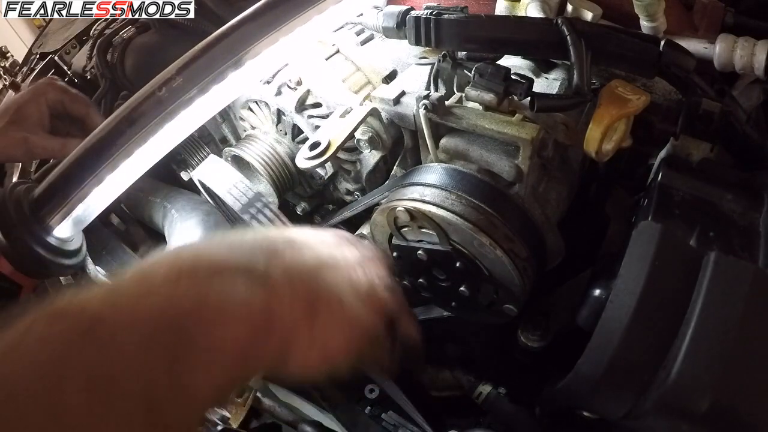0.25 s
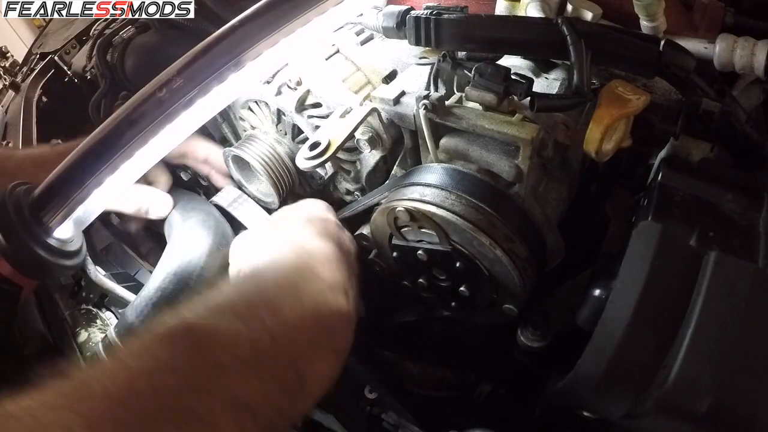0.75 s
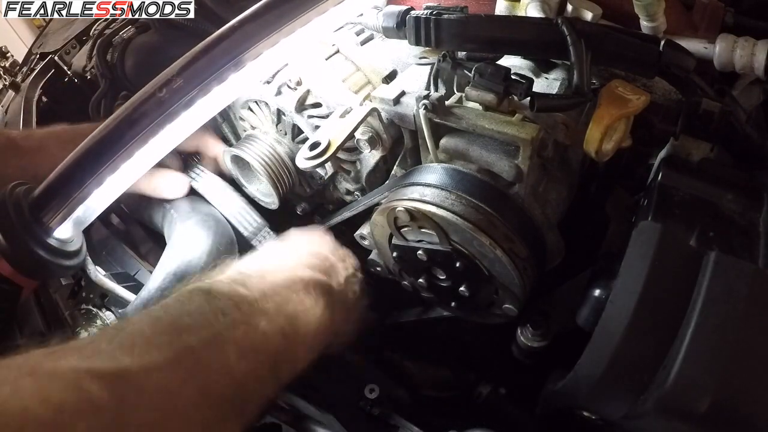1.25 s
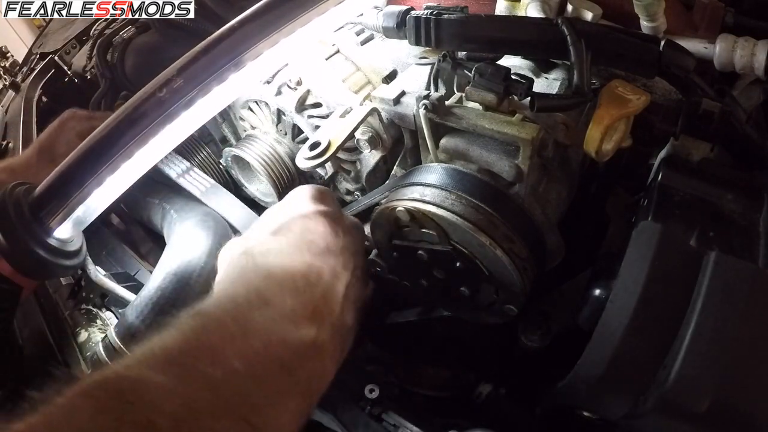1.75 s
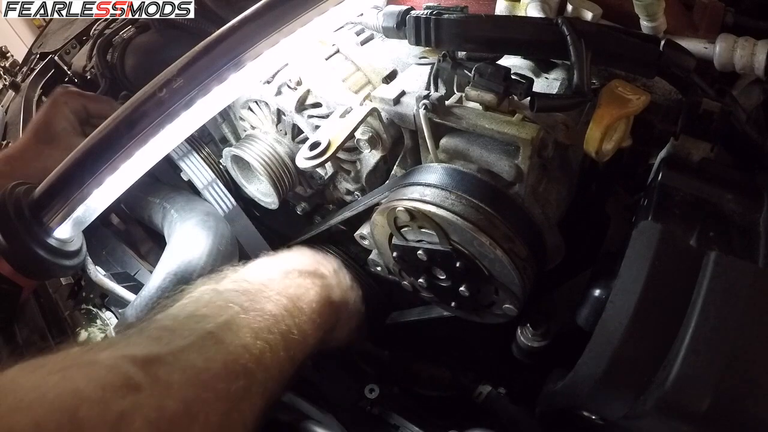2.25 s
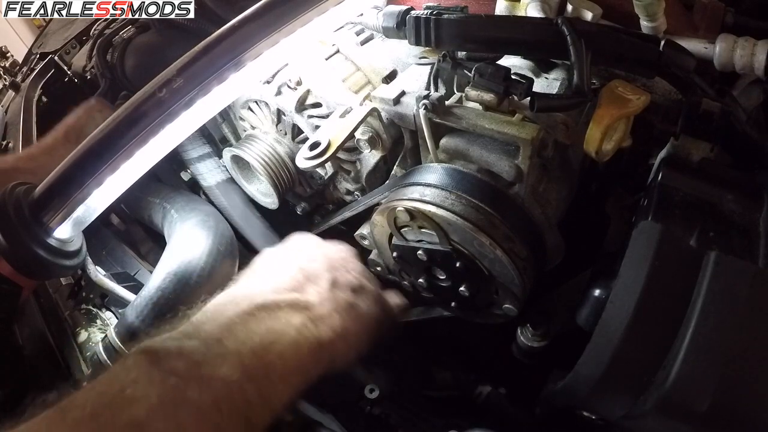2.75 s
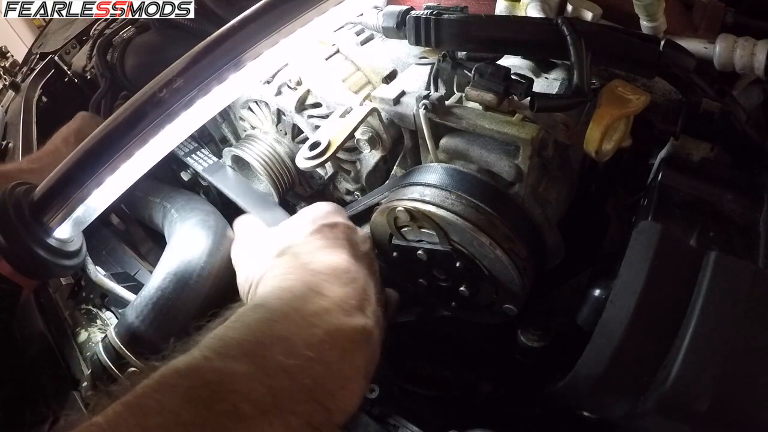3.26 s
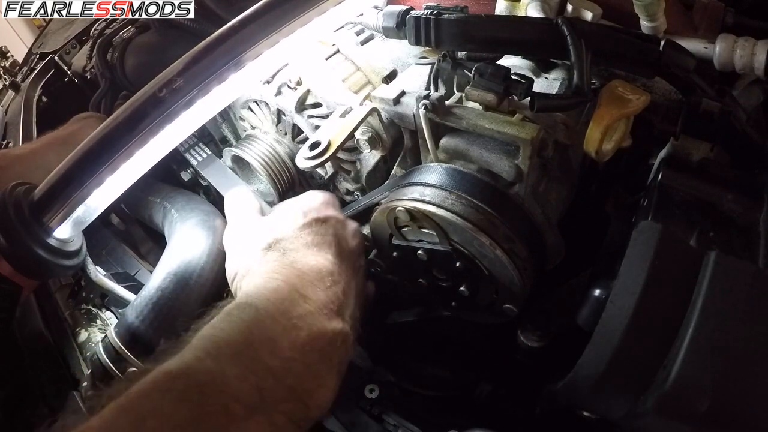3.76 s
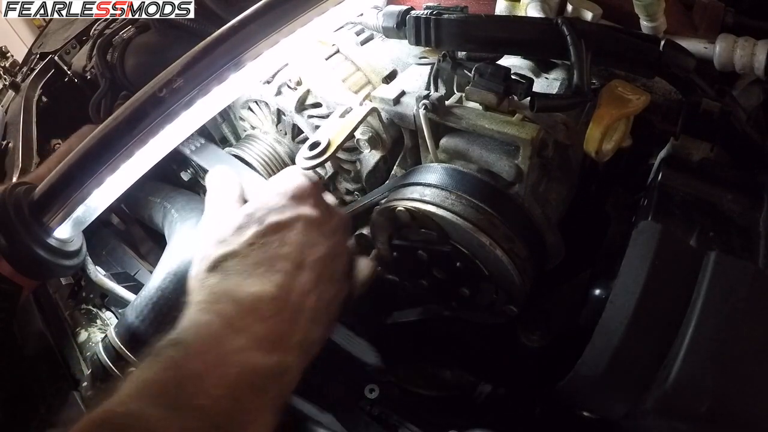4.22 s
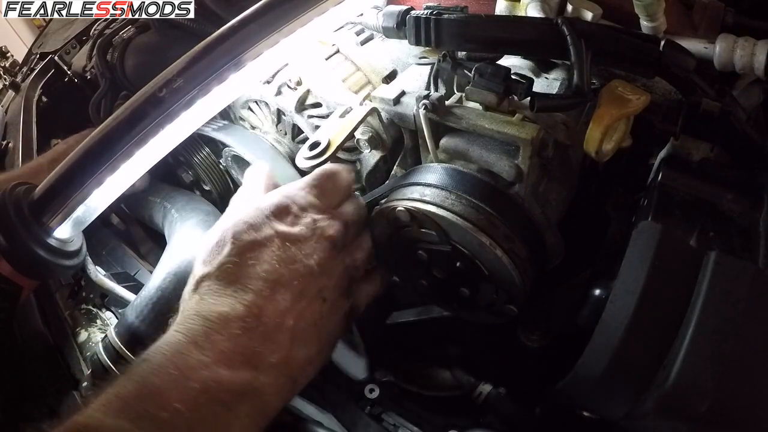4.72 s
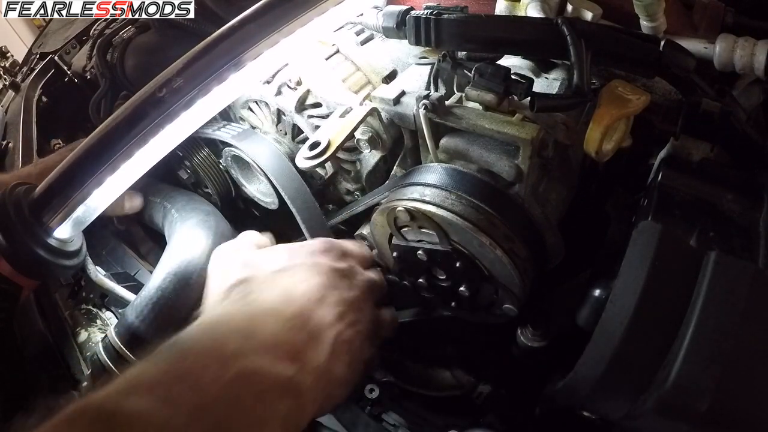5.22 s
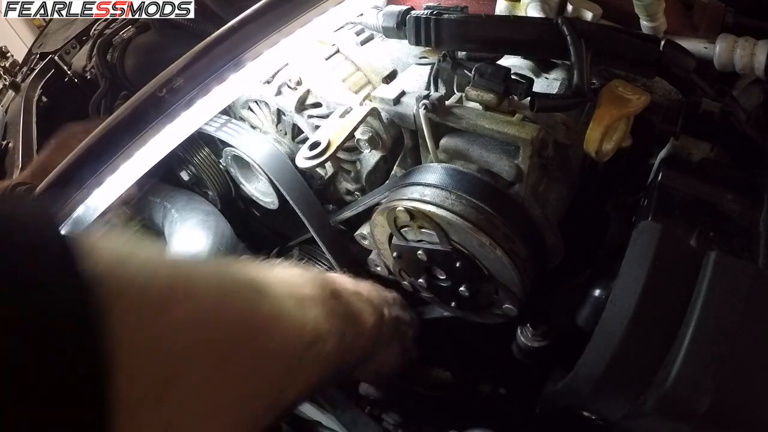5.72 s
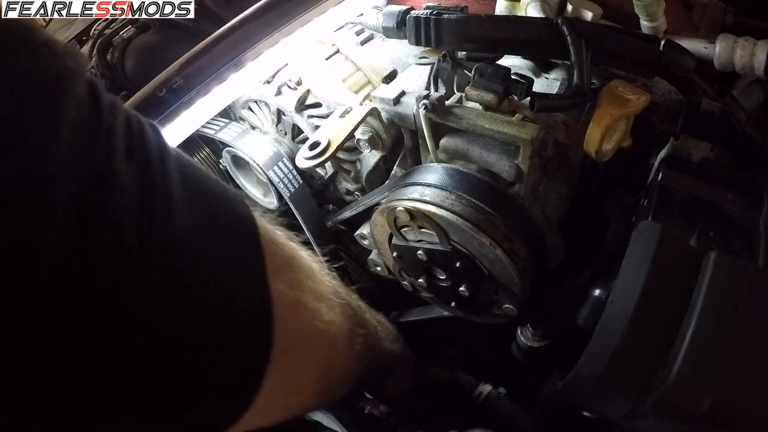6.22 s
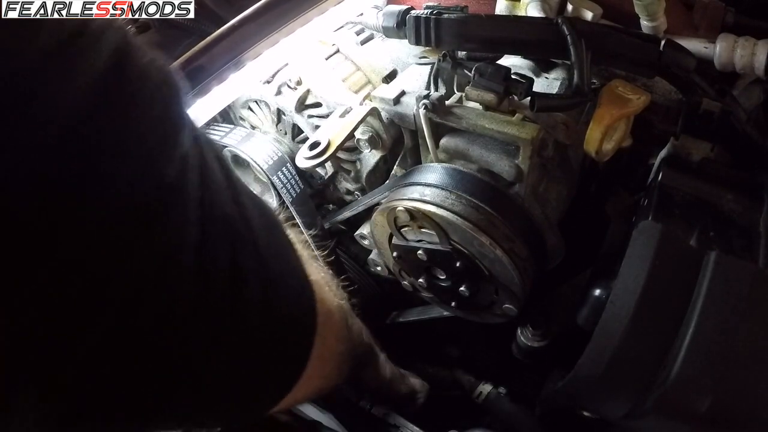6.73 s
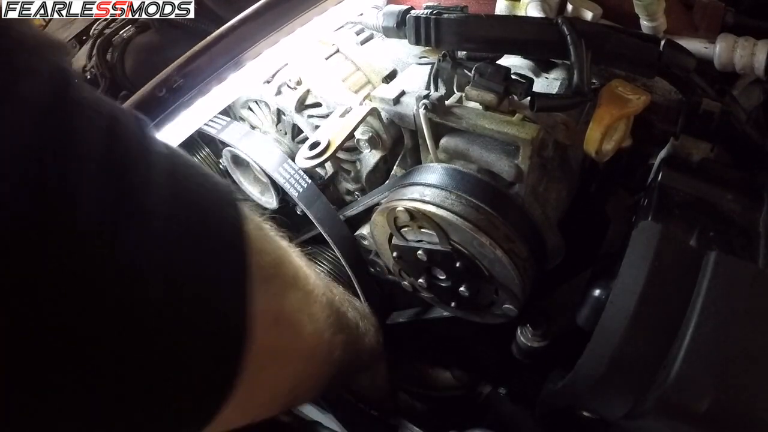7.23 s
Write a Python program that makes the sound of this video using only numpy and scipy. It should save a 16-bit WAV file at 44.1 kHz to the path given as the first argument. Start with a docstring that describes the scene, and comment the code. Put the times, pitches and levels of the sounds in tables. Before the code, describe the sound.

Close, boomy handling knocks and low rumbling tremble as a rubber belt scuffs over metal pulleys, with brief squeaks and a final sharp click.

```python
"""Ribbed belt worked onto engine pulleys

Hands work the belt in a garage, close to a small camera with two microphones clamped to the car.
Tugs and knocks ring the modes of car and mount, mostly pushing the microphones in opposite directions;
squeaks come through the metal too, and short decaying tones add pips and ticks to the clacks. Through
the air come filtered noise for rub, scuffs and hush, and narrow resonances for drones and two whistles."""
import sys
import numpy as np
from scipy import signal
from scipy.fft import rfft, irfft
from scipy.io import wavfile
from scipy.ndimage import uniform_filter1d

SR = 44100
rng = np.random.default_rng(int(sys.argv[2]) if len(sys.argv) > 2 else 0)


def inscribe(sig):
    """Save sig as 16-bit PCM at rate SR to the path in sys.argv[1].

    A 1-D sig is mono; a 2-D sig holds one channel per row.
    Samples are clipped to [-1, 1] before scaling.
    """
    pcm = np.round(np.clip(np.atleast_2d(sig).T, -1, 1) * 32767)
    wavfile.write(sys.argv[1], SR, pcm.astype(np.int16))


N = 329868

# Knocks of belt, knuckles and pulleys. Each row: start in seconds, thump in relative dB, landing place
# (-1 rocking body, 0 sway, 1 arm, 2 clamp), clack in relative dB, hardness (0 casing, 1 lid, 2 tick),
# ring of the sway (300 leaves its modes as listed), contact time in ms.
KNOCKS = [(0.0851, -4, 1.3, -2, 1.37, 320, 5.1), (0.0899, -1.5, 1.16, -30, 0, 370, 6.4),
          (0.126, -10, 1.55, -19, 0.058, 200, 4), (0.171, 3.5, 1.3, -21, 0.31, 250, 4),
          (0.302, -1, 0.7, -45, .2, 290, 3.7), (0.339, 4, 0.54, -13.5, 0.3, 130, 5.8),
          (0.396, -4, -0.2, -37, 0.71, 220, 3.4), (0.564, -13, 0.49, -44, .1, 75, 5.2),
          (0.621, -10, 0.49, -22.5, 0.35, 110, 1), (0.716, 5, 0.94, -18, 0.16, 130, 4.7),
          (0.751, 2.5, 0.83, -23, 0.11, 310, 2.6), (0.798, 3, 1.15, -14, 0.81, 100, 2.2),
          (0.807, 3, 0.74, -12, 0.5, 120, 4.8), (0.815, -17, 0.98, -11, 0.71, 110, 11),
          (0.882, 5, 1.32, -10, 0.55, 180, 7.2), (0.973, 6, 0.57, -20.5, 0.074, 510, 5.6),
          (1.015, 9, 0.5, -14, 0.79, 180, 6.2), (1.018, -7, 2, -43, 0, 150, 4),
          (1.103, -3.5, 0, -52, 0.31, 480, 4.7), (1.133, 7, 0.73, -8, 1.07, 220, 10.5),
          (1.134, -4, 2, -44, 0, 150, 4), (1.142, -1.5, 0.95, -11, 0.39, 170, 2.4),
          (1.167, -11.5, 2, -17, .8, 150, 17), (1.264, 4.5, 0.85, -35, 0.033, 170, 2.9),
          (1.301, -6, 1.57, -45, 0, 150, 4), (1.317, 4, 0.71, -48.5, 0.2, 430, 4.5),
          (1.393, 6, 0.51, -45, 0.18, 380, 4.2), (1.58, 8, 0.56, -24.5, 0.77, 170, 1.82),
          (1.663, -6.5, 1.16, -40, 0, 170, 4), (2.024, -9.5, 1.56, -45, 0.046, 150, 4),
          (2.03, 2, 0.6, -12, 0.39, 490, 16), (2.138, 1, 0.41, -32.5, 0, 135, 4.9),
          (2.294, -2.5, 0.045, -31, 0.061, 210, 3.1), (2.35, -26, -0.46, -47, 0.25, 140, 3.4),
          (2.474, 2, 0.64, -42, 0.48, 370, 4.7), (2.525, 2.5, 0.24, -50.5, .2, 200, 8.3),
          (2.548, -19, 2, -45, 0, 200, 3.5), (2.572, 8.5, 0.31, -23, 1.46, 120, 2.2),
          (2.823, 3.5, 0.51, -29, 1.2, 550, 24), (2.851, -3.5, 1.4, -45, 0, 150, 4),
          (2.87, 2.5, -0.16, -23, .2, 120, 8.1), (2.961, 4.5, 0.37, -15, 0.5, 480, 43),
          (2.981, -1.5, 1.8, -45, 0, 150, 4), (3.091, 7.5, 0.23, -41, 0.35, 94, 4),
          (3.237, -26, -0.74, -49, 0.17, 140, 4), (3.373, 9.5, 0.57, -7.5, 0.49, 410, 10),
          (3.378, -3, 1.7, -43, 0, 150, 4), (3.447, -6.5, 1.54, -51, 0.33, 390, 3.83),
          (3.5, 6.5, 0.47, -30, 0.21, 380, 3.6), (3.576, -2.5, -0.48, -28, 0.76, 250, 4),
          (3.794, -21, 2.04, -32, 0.81, 120, 4.5), (4.131, 5.5, 0.44, -34.5, 0.48, 335, 3.4),
          (4.454, -3, 0.1, -24.5, 1.46, 140, 15), (4.653, -11.5, 0.42, -42, 0, 440, 6),
          (4.7, 3, 1.62, -38, 0, 127, 4), (4.711, 1, 0.9, -45, 0, 180, 4),
          (4.734, -1.5, 0.7, -42, 0, 110, 4), (4.803, 3.5, 0.59, -17.5, 1, 900, 5.6),
          (4.806, 1.5, 1.45, -44, 0, 150, 4), (5.202, 7, 0.31, -18, 0.57, 150, 7.4),
          (5.288, -5.5, 0.068, -50, 0, 140, 4.4), (5.443, 3.5, 0.29, -42, 0, 113, 4),
          (5.476, -2.5, -0.2, -38, 0.47, 97, 3.6), (5.556, -4, 0.024, -37, 0.089, 830, 3.6),
          (5.666, -17, 1.8, -25, 0.69, 210, 83), (5.69, -3.5, 1.15, -24, 0, 200, 4.3),
          (5.715, -4, 1.1, -43, 0, 110, 4), (5.873, -4.5, 0, -26.5, 0.65, 840, 3.7),
          (5.887, -25, 0.004, -23, 0.65, 200, 10), (5.897, -1, 0.66, -12.5, 0.63, 1000, 8.7),
          (5.977, 0.5, 0.74, -20, 0.73, 850, 7), (6.058, -2, 0.55, -45, .2, 450, 4),
          (6.136, 2, -0.57, -41, 0.31, 170, 4), (6.175, 7.5, 0.53, -11.5, 0.25, 200, 7.3),
          (6.233, -10, 1.6, -44, 0, 150, 4), (6.276, -14, 1.64, -48, 0.12, 150, 4),
          (6.311, 5, 0.41, -22, 0.37, 280, 4.4), (6.369, 5, 0.77, -15.5, 0.75, 580, 22),
          (6.454, -1.5, 0.42, -40, .2, 122, 4), (6.691, -1, -0.11, -32, 0, 150, 4),
          (6.799, -9, -0.28, -42, .2, 170, 4.3), (6.818, -1, 0.71, -19, 1.33, 98, 35),
          (6.947, -15, 1.2, -48, 0, 140, 4), (6.961, -2, -0.84, -29, 1, 240, 3.5),
          (6.974, -13, 1.7, -19, 0.8, 110, 2.1), (6.986, 4, 1.35, -8, 0.85, 240, 6),
          (7.159, 13, 0.7, -2.5, 0.77, 110, 4.4), (7.183, 6, 1.2, -36, 0.16, 140, 5.2),
          (7.221, 0.5, 1.93, -9.5, 0.41, 230, 3.5)]
# Modes of the car and mount, from the heaviest part to the lightest. Each row: pitch in Hz, basic t60
# in seconds, level in relative dB, left microphone against right in dB, left phase in turns.
ROCKING_MODES = [(28, 0.087, -1.5, -5.5, 0.22), (56, 0.022, -17.5, -12.5, 0.61),
                 (73.5, 0.14, 1.2, -7.5, 0.43)]
SWAY_MODES = [(106.58, 0.29, 0.5, -10, 0.466), (132.5, 0.24, -8.5, -6.5, 0.33)]
ARM_MODES = [(181, .18, 0, -13, .49), (212, .1, -7, -11, .51), (243, .12, -12, -6, .47)]
CLAMP_MODES = [(300, .06, -8, -9, .5), (335, .1, 0, -10, .51), (385, .11, -1, -10, .51),
               (447, .08, -11, -.8, .49)]
CASING_MODES = [(518, .05, -2, -0.8, .48), (575, .06, 1, -2.1, .47), (750, 0.037, -2, -3.3, 0.58),
                (882, 0.066, -9, 1, 0.47)]
LID_MODES = [(603, 0.067, -1.5, 0, 0.47), (963, 0.046, 1.5, -7, 0.49), (1088, 0.044, 0, 4, .42),
             (1250, .03, -14, 1, 0.47), (1450, 0.058, -3, -2, 0.4), (1913, 0.039, -11.5, -6, 0.27)]


def gain_of(db):
    """Decibels to gain."""
    return 10 ** (np.asarray(db) / 20)


def evened(x):
    """Scales to rms 1."""
    return x / np.sqrt(np.mean(abs(x) ** 2) + 1e-20)


def read(points, hz):
    """Reads a spectrum on a log-frequency axis."""
    f, value = np.transpose(points)
    return np.interp(np.log(hz + 1), np.log(f + 1), value)


def along(rows, axis=1):
    """One column of a curve at every sample."""
    rows = np.asarray(rows)
    return np.interp(np.arange(N) / SR, rows[:, 0], rows[:, axis])


def add(mix, s, sound):
    """Mixes a two-channel sound in at time s."""
    part = mix[:, round(s * SR):][:, :sound.shape[1]]
    part += sound[:, :part.shape[1]]


def wobble(hz, width):
    """Noise in one resonance, as a complex oscillation of rms 1."""
    pole = np.exp((2j * hz - width) * np.pi / SR)
    push = rng.standard_normal(N) + 1j * rng.standard_normal(N)
    return evened(signal.lfilter([1], [1, -2 * pole, pole ** 2], push))


def ports(left_db, turns):
    """How one mode reaches the left and the right microphone."""
    return np.array([[gain_of(left_db) * np.exp(2j * np.pi * turns)], [1]])


def shaking(modes, level_db, blur, steady, jerky_db):
    """Small slips keep every mode of a part trembling in jerks; the beats of the trembling are partly evened out."""
    z = 0
    for hz, t60, db, left_db, turns in modes:
        z = z + gain_of(db) * ports(left_db, turns) * wobble(hz, blur / t60)
    beats = np.sqrt(uniform_filter1d(abs(z[1]) ** 2, 500) + 1e-9)
    slips = uniform_filter1d(rng.standard_normal(N), 900)
    jerks = evened(uniform_filter1d(slips, 900))
    z = z / beats ** np.clip(steady, 0, 1) * gain_of(jerky_db * jerks)
    return gain_of(level_db) * z.real / np.sqrt(np.mean(z[1].real ** 2))


def held_db():
    """While the mount rings long and freely after a knock, no hand trembles on it."""
    free_ring = 480  # a sway ring setting above this is not held by a hand
    rows = np.asarray(KNOCKS)
    t, out = np.arange(N) / SR, np.zeros(N)
    for s, ring_ms in rows[rows[:, 5] > free_ring][:, [0, 5]]:
        out[(t > s) & (t < s + .3 * ring_ms / 1000)] = -18
    return uniform_filter1d(out, 800)


def handling():
    """The car and the parts of the camera mount tremble in their modes under the working hands."""
    # How hard the hands shake the car. Each row: time in seconds, effort in relative dB, shift of the
    # trembling from the sway to the higher parts in dB before each part takes its share.
    effort = [(0.0, -48.5, 8.5), (0.14, -21.5, 0), (0.29, -31, 0), (0.44, -27.5, -1), (0.89, -24.5, 2),
              (1.2, -26.5, 1), (1.245, -35, -3), (1.31, -24, 1.5), (1.53, -29, -2), (1.77, -32.5, 1),
              (1.96, -35.5, 1), (2.71, -28, -1.5), (2.85, -33.5, 3.5), (3.0, -21, 3), (3.14, -30.5, -3),
              (3.48, -28.5, 5), (3.64, -42.5, -19), (3.83, -48.5, -9), (4.14, -46, 0), (4.35, -31.5, 1.5),
              (4.52, -40, -14), (4.6, -51, -5), (4.69, -40, -3), (4.85, -30.5, 7.5), (5.02, -58, -4),
              (5.18, -51, 10), (5.27, -38, 4.5), (5.39, -32, -1), (5.62, -27, -7.5), (5.94, -38, 4),
              (6.08, -21.5, 1), (6.27, -21.5, -1.5), (6.48, -35.5, -4.5), (6.73, -34.5, 4),
              (7.04, -30, 2.5), (7.1, -22.5, -2.5), (7.21, -17.5, 0), (7.35, -26, 4.5), (7.48, -29, -6)]
    effort_db, shift_db = along(effort, axis=1), along(effort, axis=2)
    # each part: dB above the effort, share of the shift
    rocking_db = effort_db + 2.6 - 0.74 * shift_db
    sway_db = effort_db + 10.7 - 0.23 * shift_db
    arm_db = effort_db + 5.93 + 0.92 * shift_db
    clamp_db = effort_db - 10 + 2.1 * shift_db
    casing_db = effort_db - 23.5 + 0.66 * shift_db
    lid_db = casing_db - 4.5
    free_db = held_db()
    out = shaking(ROCKING_MODES, rocking_db + 0.35 * free_db, blur=3.9, steady=0.22, jerky_db=3.5)
    out += shaking(SWAY_MODES, sway_db + free_db, blur=9.0, steady=0.61, jerky_db=4.5)
    out += shaking(ARM_MODES, arm_db + 0.054 * free_db, blur=6.23, steady=0.89, jerky_db=3.0)
    out += shaking(CLAMP_MODES, clamp_db, blur=1.86, steady=0.49, jerky_db=4.5)
    out += shaking(CASING_MODES, casing_db, blur=4, steady=0.18, jerky_db=-2.5)
    return out + shaking(LID_MODES, lid_db, blur=4, steady=0.2, jerky_db=4.0)


def airborne(spectrum, alike, balance, patchy_db, size):
    """Random short-time spectra with drifting patches, partly alike at the two microphones."""
    frames, hz = 4 * N // size + 6, np.fft.rfftfreq(size, 1 / SR)
    a, b, c, d, patches = rng.standard_normal((frames, len(hz), 5)).T
    patches = uniform_filter1d(patches, size // 64, 0)  # smooth over frequency, then over time
    patches = evened(uniform_filter1d(patches, 8192 // size, 1))
    same, left = np.clip(read(alike, hz), -1, 1)[:, None], a + 1j * b
    right = same * left + np.sqrt(1 - same ** 2) * (c + 1j * d)
    z = np.array([left, right])
    z *= gain_of(np.array([.5, -.5])[:, None, None] * read(balance, hz)[:, None])
    z *= gain_of(read(spectrum, hz)[:, None] + patchy_db * patches)
    return evened(signal.istft(z, nperseg=size, noverlap=3 * size // 4)[1][:, :N])


def room():
    """Hush and low drones swell together; two thin resonant whistles swell alone, stronger on the left."""
    # Room and microphone noise. Each row: frequency in Hz, density in relative dB.
    hush = [(18, -36.5), (30, -0.5), (54, -8.5), (114, -9.5), (155, -16.5), (240, -7.5), (636, -29.5),
            (705, -31), (844, -31), (1480, -33.5), (2360, -45), (6250, -49.5), (10400, -52.5), (12200, -59),
            (13800, -88.5)]
    # Each row: frequency in Hz, likeness of the two microphones from -1 to 1.
    hush_alike = [(100, -0.25), (400, 0.039), (1200, -0.26), (2500, 0.049), (4000, 0.87), (6500, -0.3),
                  (12000, 0.012)]
    # Each row: frequency in Hz, left minus right in dB.
    hush_balance = [(30, -2.5), (150, -4), (500, 0.5), (4000, -0.5), (6500, 1), (9000, -4.5), (13000, 2)]
    # Steady drones. Each row: pitch in Hz, width in Hz, level in relative dB.
    hum = [(237.5, 7.2, -42.5), (703, 10.5, -58), (1477, 87, -63.5)]
    # Swell of hush and drones. Each row: time in seconds, change in dB.
    room_swell = [(0, 1), (0.6, 1.5), (1.1, -0.5), (1.6, -0.5), (2.1, 2), (2.8, 3.5), (3.2, 2), (3.55, 1.5),
                  (3.9, 1), (4.3, 4), (4.6, 1.5), (4.9, 2.5), (5.6, 0.5), (6.2, 1), (6.6, 0.5), (7.1, 2),
                  (7.48, -1)]
    # Swells of the two whistles. Each row: top in seconds, peak in relative dB, length in ms.
    low_swells = [(1.655, -57, 150), (1.77, -70, 140), (1.899, -66, 56), (2.1, -65, 250), (2.55, -68, 300),
                  (3.385, -63, 140), (3.23, -65, 150), (3.501, -69, 190), (3.655, -55, 73),
                  (3.759, -65, 180), (3.9, -64, 190), (4.04, -63, 220), (4.15, -76, 140), (4.26, -58, 110),
                  (4.42, -49, 39)]
    high_swells = [(0.99, -65, 90), (1.905, -61, 68.5), (2.615, -56, 98), (3.85, -67, 262),
                   (4.071, -44.5, 67.4), (3.94, -68, 59), (4.24, -79, 69), (4.539, -62, 120),
                   (4.66, -75, 70)]
    swell_fall_db, swell_rise = 17, 3.5  # drop one length after the top; rise against fall in speed

    out = gain_of(-36) * airborne(hush, hush_alike, hush_balance, patchy_db=2.0, size=2048)
    for hz, width, db in hum:
        drone = wobble(hz, width)
        out += gain_of(db) * (drone / abs(drone) ** 0.3).real  # evens out the beats a little
    out *= gain_of(along(room_swell))
    t = np.arange(N) / SR
    whistles = (4581, low_swells, [[1.5], [-1.5]]), (6342, high_swells, [[4], [-3]])
    for hz, swells, sides_db in whistles:
        tone = wobble(hz, 14)
        level = np.zeros(N)
        for s, db, ms in swells:
            away_ms = np.maximum(t - s, swell_rise * (s - t)) * 1000
            level += gain_of(db - swell_fall_db * away_ms / ms)
        out += gain_of(sides_db) * level * (tone / abs(tone) ** 1.06).real
    return out


def belt_rub():
    """Rubber ribs drag over metal in small uneven slips that roughen the hiss."""
    # Colour of the dry rub. Each row: frequency in Hz, level in relative dB.
    rub = [(1200, 0.5), (2000, 1.5), (3000, -1.5), (4500, -10.5), (6200, 3), (7400, -2.5), (8500, -18),
           (12000, -26), (14000, -60.5)]
    # Each row: time in seconds, level of the rub in relative dB.
    rubbing = [(0.06, -63), (0.13, -53), (0.41, -62.5), (0.71, -55), (0.92, -61.5), (1.61, -62),
               (1.73, -61.5), (2.26, -56.5), (2.76, -56.5), (3.0, -59), (3.61, -62), (3.79, -60.5),
               (4.1, -57), (4.34, -56), (5.27, -59), (5.47, -57.5), (5.86, -56), (6.23, -56.5),
               (6.43, -58.5), (6.61, -59.5), (6.99, -55.5), (7.22, -56.5), (7.4, -59.5)]
    strength = gain_of(3.4 * np.minimum(rng.exponential(1, N), 4))
    slips = (rng.random(N) < 220 / SR) * strength  # about 220 slips a second
    slips = signal.lfilter([1], [1, -np.exp(-1 / (0.0063 * SR))], slips)
    alike = [(2000, 0.37), (4000, 0.62), (7000, 0.27), (12000, 0.22)]
    balance = [(2000, -.5), (8000, .5)]
    hiss = airborne(rub, alike, balance, patchy_db=3.0, size=512)
    return gain_of(along(rubbing)) * evened(hiss * (4.1 + evened(slips)))


def clack_pips():
    """Short pips and ticks of the clacks, with a few thin pings: slightly rough tones that die quickly."""
    # Each row: start in seconds, level in relative dB, pitch in Hz, t60 in ms.
    pips = [(0.085, -16, 834, 26), (0.088, -17, 650, 39), (0.086, -24, 1930, 32), (0.087, -32, 2820, 18),
            (0.093, -29, 1550, 45), (0.088, -30, 4570, 20), (0.099, -42.5, 4670, 46),
            (0.801, -43, 2210, 11), (0.806, -40, 1940, 19), (0.812, -35, 1100, 30), (0.818, -37, 1560, 25),
            (0.884, -27, 950, 25), (0.885, -36, 1420, 23), (0.979, -36, 800, 27), (1.018, -29, 960, 27),
            (1.017, -30, 1450, 25), (1.131, -31, 2440, 6.4), (1.134, -22, 860, 65),
            (1.134, -31.5, 1480, 30), (1.137, -40, 2600, 9.2), (2.5713, -27, 2280, 5.3),
            (2.5706, -31, 1300, 8), (2.578, -35, 2730, 8.6), (2.588, -43, 2600, 8.8),
            (2.6167, -29.5, 2230, 7.7), (2.6167, -36, 4530, 6.8), (2.624, -38, 2880, 10),
            (2.96, -30, 1100, 30), (3.372, -38, 2400, 12), (3.374, -32, 1900, 18), (3.374, -30, 1430, 32),
            (3.376, -28, 970, 25), (3.672, -42, 1440, 40), (4.058, -48, 2730, 65), (4.066, -56, 3450, 100),
            (4.072, -49, 2950, 50), (4.253, -39, 1400, 51), (4.332, -46, 3060, 47),
            (4.458, -48.5, 2760, 28), (5.901, -27, 840, 30), (6.177, -21, 1050, 31), (6.188, -38, 1090, 16),
            (6.368, -32, 910, 30), (6.371, -37, 1500, 45), (6.385, -37, 1060, 30), (6.846, -42, 5130, 10),
            (6.944, -41, 4390, 12), (6.962, -35, 5160, 22), (6.97, -42, 6340, 33), (6.978, -38, 5260, 22),
            (6.984, -37, 5400, 10), (6.975, -25, 1030, 13), (6.988, -22, 1020, 22), (6.988, -22, 1510, 22),
            (7.036, -39, 3900, 8), (7.091, -48, 4540, 11), (7.129, -46, 3670, 22), (7.133, -43, 2270, 28),
            (7.138, -44, 3100, 19), (7.16, -24, 1070, 22), (7.16, -30, 1550, 18), (7.16, -33, 1970, 11),
            (7.16, -38, 2470, 10), (7.222, -26, 980, 22)]
    rise_ms, dull_hz, dull_turns = 0.87, 2000, .25
    out, t = np.zeros((2, N)), np.arange(2000) / SR
    for s, db, hz, t60_ms in pips:
        (waver, grit), (phase, apart) = rng.standard_normal((2, 2000)), rng.random(2)
        waver, grit = evened(uniform_filter1d(waver, 30)), evened(uniform_filter1d(grit, 30))
        # pips of low pitch come through the metal, which shifts the left phase further
        left_turns = 0.18 * apart + dull_turns * (hz < dull_hz)
        turns = np.cumsum(hz * (1 + 0.029 * waver)) / SR + phase + left_turns * np.array([[1], [0]])
        shape = np.minimum(1000 * t / rise_ms, 1) * gain_of(db - 60000 * t / t60_ms + 2.0 * grit)
        add(out, s, shape * np.sin(2 * np.pi * turns))
    return out


def ring(modes, level_db, longer, chance):
    """One part rings; each blow varies every mode at random in pitch, phase, strength and side."""
    shortest_s, longest_bright_s = .004, .022  # limits of t60, the second for modes from 2 kHz up
    in_step_hz = 120  # the higher a mode lies above this, the nearer it starts in step with the blow
    sideways_turns = .07  # spread of the left phase from blow to blow
    out = np.zeros((2, SR // 2))
    for (hz, t60, db, left_db, turns), (phase, detune, strength, side) in zip(modes, chance - .5):
        t60 = np.clip(t60 * longer, shortest_s, .9 if hz < 2000 else longest_bright_s)
        t = np.arange(int(min(1.0 * t60 * SR, SR // 2))) / SR
        rise = 1 - np.exp(-t / (0.00049 + 0.71 / hz))  # low modes take part of a cycle to swing up
        pitch = hz * (1 + 0.042 * detune * min(hz / 500, 1))
        cycles = pitch * t + phase * min(in_step_hz / hz, 1) - 1 / 4
        z = rise ** (2 if hz < 500 else 1) * np.exp(2j * np.pi * cycles)
        heard = (ports(left_db, turns + sideways_turns * side) * z).real
        out[:, :len(t)] += heard * gain_of(level_db + db + 5.1 * strength - 60 * t / t60)
    return out


def contact_chatter(noise, contact_ms):
    """Spiky noise: a hard landing, chatter while the contact lasts, then loose parts rattling on faintly."""
    ms = np.arange(2000) * 1000 / SR
    touch = np.clip(1 - 0.24 * ms / contact_ms, 0, 1) * (ms < contact_ms)
    chatter = noise ** 3 * (touch + gain_of(-33 - .4 * ms))
    chatter[0] = gain_of(5) * np.linalg.norm(chatter)  # the landing, 5 dB above all that chatter
    return chatter


def knocks():
    """Each blow swings the heavy parts once; the light parts chatter as long as the contact lasts."""
    # Modes of the hardest tick. Each row: pitch in Hz, basic t60 in seconds, level in relative dB,
    # left microphone against right in dB, left phase in turns.
    tick_modes = [(578, .06, 1, 1.5, .08), (830, .03, -2, -.5, .05), (958, .04, 0, -1.5, .1),
                  (1150, .025, -4, 0, .1), (1510, .035, -2, -.5, .12), (1970, .025, -6, -2.5, .2),
                  (2300, .012, -11, -1, .1), (2750, .015, -10, -.3, .05)]
    # Dry crack of a hard contact. Each row: frequency in Hz, level in relative dB.
    crack_colour = [(300, -34.5), (700, 5.5), (1500, -13), (2200, -1.5), (3500, -20), (4600, -7.5),
                    (5300, -12.5), (7000, -15), (9000, -45.5), (14000, -61)]
    thump_fall_db, clack_fall_db, crack_fall_db = 14.5, 19.5, 18.5  # for each step of place or hardness
    crack_t60, echo_t60 = .026, 0.27  # seconds
    out, t = np.zeros((2, N)), np.arange(4096) / SR
    dull = signal.butter(4, 1800, fs=SR)
    colour = gain_of(read(crack_colour, np.fft.rfftfreq(4096, 1 / SR)))
    for s, thump_db, place, clack_db, hardness, sway_ring, contact_ms in KNOCKS:
        heavy_db = thump_db - thump_fall_db * abs(np.arange(-1, 3) - place)
        rocking_db, sway_db, arm_db, clamp_db = heavy_db
        casing_db, lid_db, tick_db = clack_db - clack_fall_db * abs(np.arange(3) - hardness)
        chance, noise = rng.random((7, 8, 4)), rng.standard_normal(2000)
        shared, left, right = rng.standard_normal((3, 4096))

        add(out, s, ring(SWAY_MODES, sway_db - 2.0, sway_ring / 300, chance[0]))
        add(out, s, ring(ARM_MODES, arm_db - 3.5, 0.93, chance[1]))
        add(out, s, ring(CLAMP_MODES, clamp_db - 0.1, 0.8, chance[2]))
        add(out, s, ring(ROCKING_MODES, rocking_db + 1.5, 2.0, chance[6]))

        light = ring(CASING_MODES, casing_db, 1.0, chance[3])
        light += ring(LID_MODES, lid_db - 6.5, 0.63, chance[4])
        light += ring(tick_modes, tick_db - 9.5, 1.0, chance[5])
        crack_db = clack_db - 12 - crack_fall_db * abs(2 - hardness)
        crack = evened(irfft(rfft(shared + 0.35 * np.array([left, right])) * colour))
        light[:, :len(t)] += crack * gain_of(crack_db - 60 * t / crack_t60)
        echo = signal.lfilter(*dull, crack[::-1, ::-1])  # the garage walls return the crack, duller
        echo_gain = gain_of(crack_db - 4.5 - 60 * t / echo_t60) * np.minimum(t / 0.002, 1)
        light[:, :len(t)] += echo * echo_gain

        chatter = contact_chatter(noise, contact_ms)
        rattled = signal.fftconvolve(light[:, :8000], chatter[None], axes=1)
        add(out, s, rattled * np.linalg.norm(light) / np.linalg.norm(rattled))
    return out


def scuffs():
    """Rubber and skin scuff dry metal: gritty puffs of band noise; the shortest are ticks that reach lower."""
    # Each row: time in seconds (the puff starts 2 ms ahead), level in relative dB, centre in Hz,
    # nominal length in ms.
    dry_scuffs = [(0.189, -53.5, 4040, 12), (0.798, -50, 3420, 12), (0.875, -56, 3930, 12),
                  (1.012, -52, 3100, 7.3), (1.132, -50, 3100, 15), (1.152, -51.5, 4650, 38),
                  (1.286, -56.5, 5070, 31), (1.385, -57, 4220, 19), (1.563, -59, 4270, 72),
                  (1.658, -50.5, 3300, 4.7), (1.744, -58.5, 5040, 47), (2.014, -51.5, 5370, 45),
                  (2.286, -52, 3620, 8.1), (2.44, -59, 3770, 12), (2.509, -53.5, 5340, 19),
                  (2.62, -53.5, 3080, 25), (2.646, -58, 3770, 18), (2.809, -55.5, 4500, 95),
                  (2.974, -56, 3200, 21), (3.373, -49, 3060, 15), (3.4, -50.5, 3800, 6.8),
                  (3.546, -51.5, 2750, 10), (3.923, -56.5, 4700, 44), (4.06, -61, 5150, 25),
                  (4.117, -51, 4700, 5.3), (4.248, -57.5, 4530, 24), (4.322, -49.5, 4200, 24),
                  (4.414, -59, 3600, 91), (4.762, -55, 3700, 9), (4.801, -49.5, 2960, 11),
                  (5.755, -54, 4100, 17), (5.889, -55, 3900, 37), (6.306, -50.5, 4250, 5.9),
                  (6.362, -53, 3970, 29), (6.624, -52.5, 5680, 17), (6.668, -56, 5300, 12),
                  (6.691, -58, 4270, 28), (6.805, -54, 3700, 34), (6.842, -56, 5400, 21),
                  (6.943, -55, 4920, 40), (7.107, -54.5, 4700, 120), (7.131, -52, 3400, 19),
                  (7.153, -56, 2830, 11)]
    out = np.zeros((2, N))
    for s, db, hz, ms in dry_scuffs:
        n = int(np.clip(ms * 1.37 * SR / 1000, 100, 4000))
        shared, left, right, grit = rng.standard_normal((4, 4000))[:, :n]
        band = [hz / (1.74 + 7.9 / ms), min(hz * 1.63, 7800)]
        colour = signal.butter(3, band, "bandpass", fs=SR)
        roughness = gain_of(1.9 * evened(uniform_filter1d(grit, 40)))
        puff = signal.lfilter(*colour, (shared + np.array([left, right])) * roughness)
        shape = signal.windows.tukey(n, .4) * np.linspace(1.3, .5, n)
        add(out, s - .002, gain_of(db) * evened(puff) * shape)
    return out


def squeaks():
    """Stick-slip tones of the belt, slightly rough, carried by the lid to the microphones in opposite phase."""
    # Each row: start in seconds, peak on the left in relative dB, pitch in Hz, length in ms.
    belt_squeaks = [(1.744, -39, 1080, 31), (2.004, -36, 1120, 12), (2.021, -31, 1130, 32),
                    (2.065, -61, 1117, 17), (2.088, -38.5, 1090, 28), (2.145, -44, 1134, 25),
                    (2.302, -36, 1100, 15), (2.958, -29, 1104, 21), (2.978, -31, 1380, 13),
                    (5.68, -42, 1124, 33), (6.505, -45, 1420, 25), (6.69, -41, 1414, 32),
                    (6.82, -31, 1480, 11.6), (7.149, -28.5, 1090, 7), (7.184, -28, 1077, 10)]
    out = np.zeros((2, N))
    for s, db, hz, ms in belt_squeaks:
        n = int(np.clip(ms * SR / 1000, 100, 3000))
        waver = evened(uniform_filter1d(rng.standard_normal(3000), 120))[:n]
        turns = np.cumsum(hz * (1 + 0.014 * waver)) / SR
        tone = np.sin(2 * np.pi * turns) * np.hanning(n) ** 0.059
        add(out, s, gain_of(db) * tone * np.array([[1], [-gain_of(-6.0)]]))
    return out


def scene():
    """Structure-borne and airborne sound together."""
    through_metal = handling() + knocks() + squeaks()
    through_air = scuffs() + belt_rub() + room()
    return through_metal + through_air + clack_pips()


def record(dry):
    """Gain control, led by the right side, sinks at loud passages and slowly returns; soft overload; band limit."""
    ceiling, edge_hz = .95, 14700
    power_db = 10 * np.log10(abs(uniform_filter1d(dry[1] ** 2, 4000)) + 1e-12)
    fall = np.arange(N) * 4.7 / SR  # the held level falls 4.7 dB a second
    held = np.maximum.accumulate(power_db + fall) - fall
    over_db = np.maximum(held + 19.5, 0)
    ducked = gain_of(5.0) * dry / gain_of(0.55 * uniform_filter1d(over_db, 2000))
    loud = ducked / (1 + abs(ducked / ceiling) ** 8) ** (1 / 8)
    band_limit = signal.firwin(511, edge_hz, window=("kaiser", 9), fs=SR)
    return signal.oaconvolve(loud, band_limit[None], "same")


dry = scene()
out = record(dry)
inscribe(out)
```